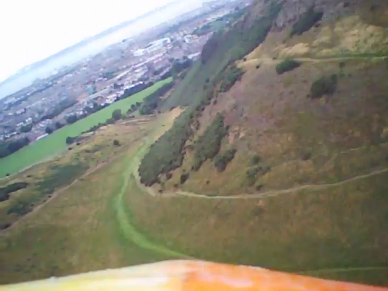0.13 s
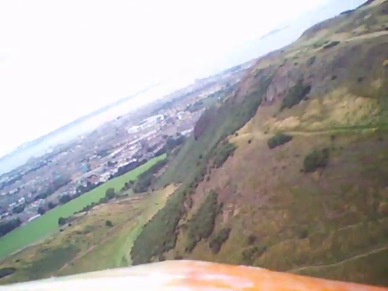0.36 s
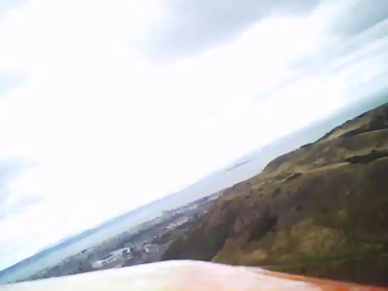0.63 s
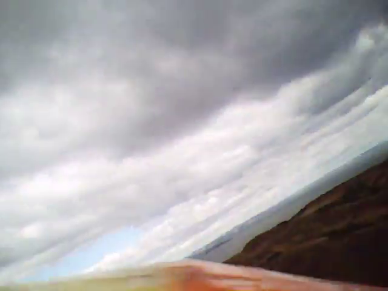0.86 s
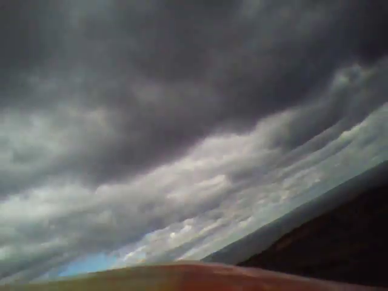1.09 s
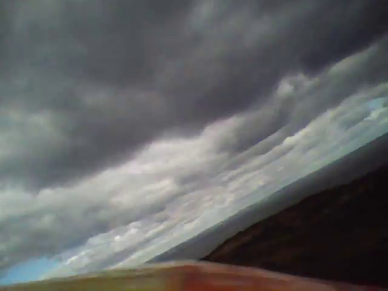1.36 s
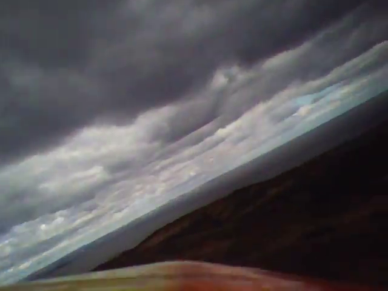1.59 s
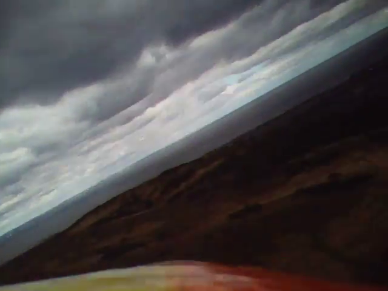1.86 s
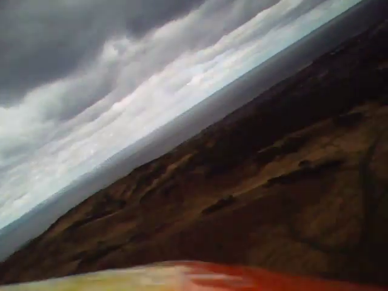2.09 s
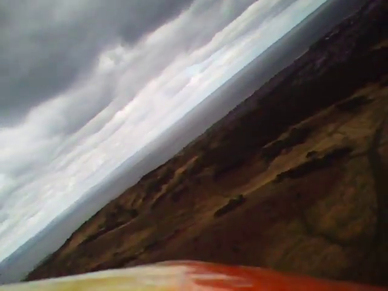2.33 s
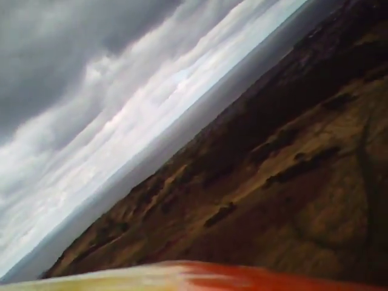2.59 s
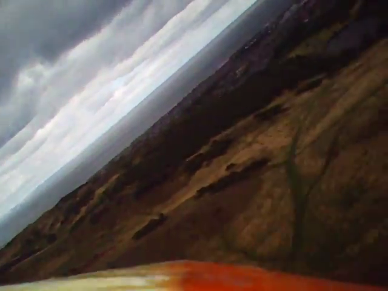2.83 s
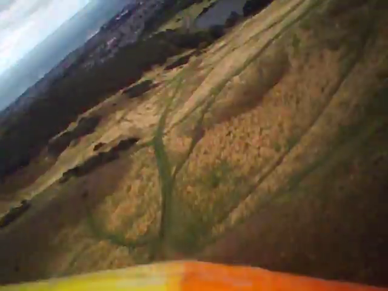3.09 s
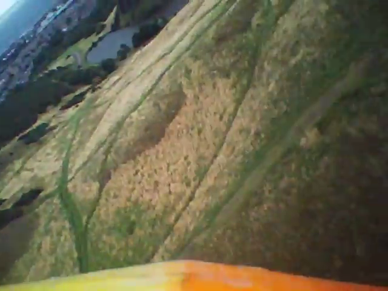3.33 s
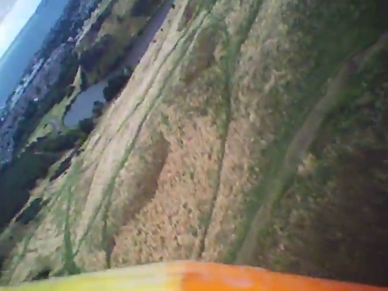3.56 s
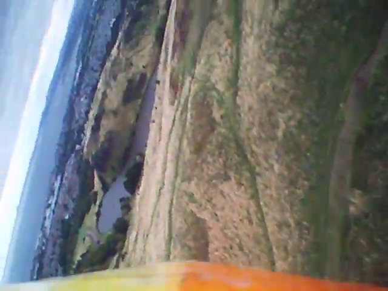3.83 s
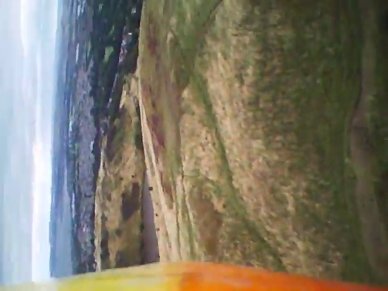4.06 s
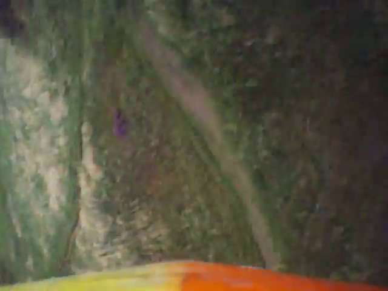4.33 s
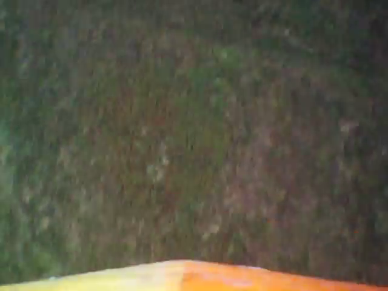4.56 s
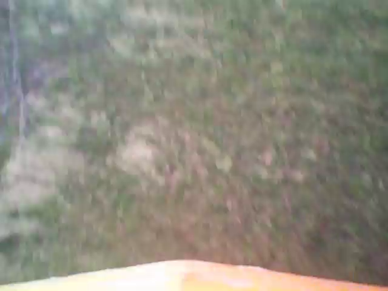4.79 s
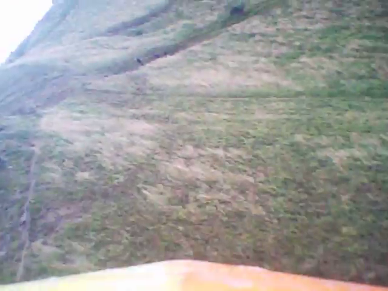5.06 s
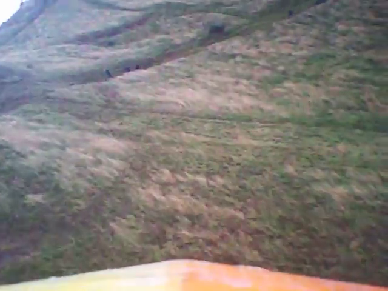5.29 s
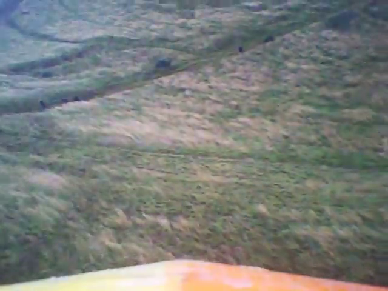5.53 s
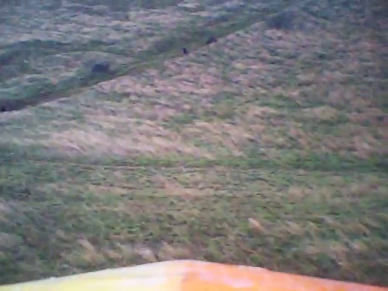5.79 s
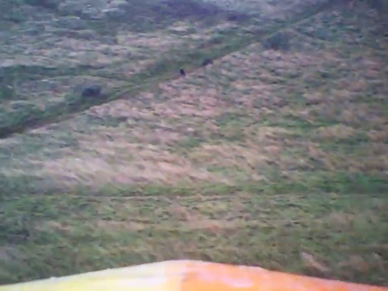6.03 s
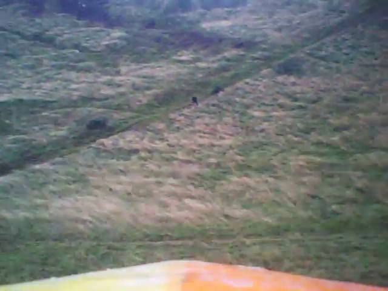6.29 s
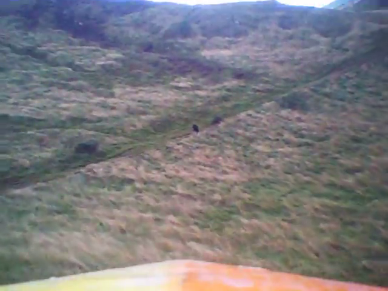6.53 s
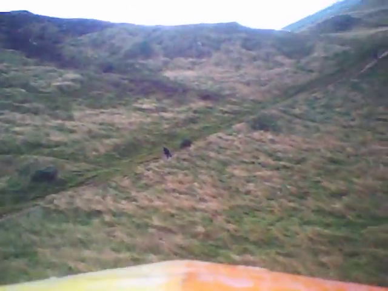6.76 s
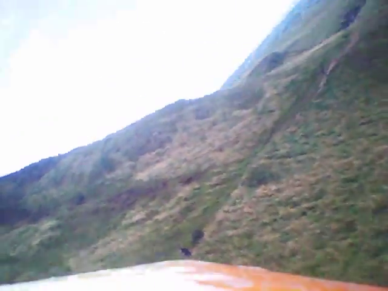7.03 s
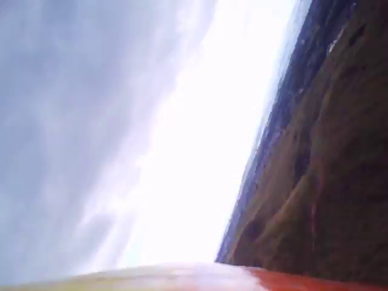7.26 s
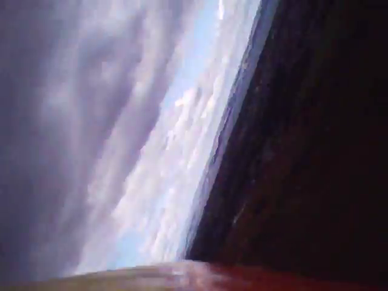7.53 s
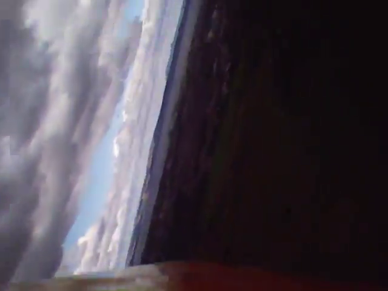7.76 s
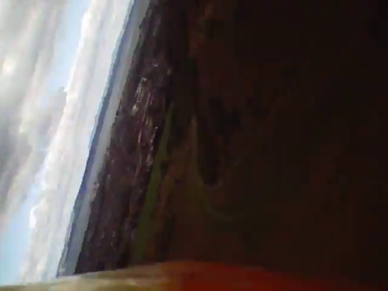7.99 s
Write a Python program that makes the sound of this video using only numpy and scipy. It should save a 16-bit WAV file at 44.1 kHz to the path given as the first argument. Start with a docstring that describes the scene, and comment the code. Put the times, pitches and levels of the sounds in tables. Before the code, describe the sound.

Heavily distorted airflow batters a tiny exposed microphone in flight, ragged and loud, easing twice into deep throbbing buffets before roaring back.

```python
"""Airflow tears past the bare microphone of a small camera on a flying glider: slow buffeting eddies
and a finer rush, both made of filtered noise, come in uneven gusts.
They overdrive the preamplifier into its rails. A converter with no input filter reads it 8000 times a second,
and the overshoots of the smoothing filter are cut off at full scale."""
import sys
import numpy as np
from scipy import signal
from scipy.fft import rfft, irfft
from scipy.io import wavfile
from scipy.ndimage import uniform_filter1d, map_coordinates

SR = 44100
rng = np.random.default_rng(int(sys.argv[2]) if len(sys.argv) > 2 else 0)


def bounce(signal):
    """Save signal as a 16-bit WAV file at the path given by the first command-line argument."""
    frames = np.transpose(np.atleast_2d(signal))
    limited = np.clip(frames, -1, 1)
    pcm = np.round(limited * 32767).astype(np.int16)
    wavfile.write(sys.argv[1], SR, pcm)


def gain_from_decibels(decibels):
    """Convert decibel values to linear amplitude factors."""
    exponent = np.asarray(decibels, float) / 20
    return 10 ** exponent


N = 358533  # length in samples
CONVERTER_HZ = 8000  # readings a second
FULL_SCALE = 0.7071  # largest level of the converter


def unit_power(gain):
    """Brings each column of a frequency-by-time gain to power 1."""
    return gain / np.sqrt(np.mean(gain ** 2, axis=0))


def column(rows, k, t):
    """Reads one column of a table at the times t, in straight lines between rows."""
    rows = np.array(rows)
    return np.interp(t, rows[:, 0], rows[:, k])


def wobble(rate, t):
    """A smooth random curve through knots of rms 1, rate of them a second."""
    knots = rng.standard_normal(int(N * rate / SR) + 9)
    return map_coordinates(knots, [t * rate])


# pitch of the buffeting eddies: t/s, f/Hz
BUFFET_PITCH = [(0, 99), (.5, 83.5), (.85, 52), (1.3, 108.7), (1.7, 70.7), (1.95, 132), (2.15, 88),
                (2.5, 71.2), (3.7, 71.9), (4.0, 90.3), (4.35, 152.7), (4.5, 115.3), (4.9, 88), (5.5, 87.6),
                (5.75, 128.5), (6.1, 94.8), (7.2, 104.4), (7.5, 82.7), (8.13, 91)]


def buffet(hz, t, loose=1.23, clean=2.1, calm=0.18):
    """Large eddies shed at a loose pitch, a resonance that sharpens when a strong flow carries little rush."""
    little_rush = np.exp(-column(FLOW, 2, t) / calm)
    strength = np.clip(column(FLOW, 1, t) / 10, 0, 1)
    sharpness = loose + clean * little_rush * strength
    u = hz / column(BUFFET_PITCH, 1, t)
    resonance = 1 + (sharpness * (u - 1 / u)) ** 2
    tilt = (0.32 + u ** 2) * (1 + 0.31 * u ** 2)
    return unit_power(u / np.sqrt(resonance * tilt))


# surges of finer eddies: middle t/s, half length t/s, rise of the rush's upper corner f/Hz
RUSH_SURGES = [(0, 0.18, 420), (1.927, 0.19, 644), (2.696, 0.11, 220), (3.282, .16, 730), (3.727, .05, 302),
               (4.2, 0.081, 248), (4.559, 0.1174, 730), (5.818, 0.23, 440), (6.3, 0.28, 180),
               (7.697, .1, 198), (8.13, .1, 710)]


def corner(t):
    """Upper corner of the rush in Hz: it rises and falls in a bell with each surge."""
    between_surges_hz = 384.3
    bells = (rise_hz * np.exp(-((t - middle) / half) ** 2) for middle, half, rise_hz in RUSH_SURGES)
    return between_surges_hz + sum(bells)


def rush(hz, t, span=0.2, slope=3.93, tail_db=-32):
    """Small eddies: a broad band whose edges move with their size, a weak hiss above."""
    upper_hz = corner(t)
    band = 1 / (1 + (hz / upper_hz) ** slope)
    hiss = gain_from_decibels(tail_db) ** 2 / (1 + (hz / 4000) ** 2)
    low_cut = 1 + (span * upper_hz / hz) ** 2
    return unit_power(np.sqrt((band + hiss) / low_cut))


# flow at the microphone port, before gusts and random swings: t/s, pressure level over the rail gap/dB,
# rush's share of the power [0-1], shift of the working point, negative as it sags [in rms of the pressure]
FLOW = [(0, 17.5, .68, -.54), (.75, 16, 0.66, -0.47), (.98, 13, 0.61, -.38), (1.12, 10, 0.39, -0.12),
        (1.33, 4, 0.3, -.1), (1.48, 15, .55, -0.26), (1.95, 10.5, .9, -0.27), (2.12, 12, .82, -.32),
        (2.4, 0, 0.19, 0.21), (2.55, 0.5, .22, 0.28), (2.85, 0.5, 0.17, 0.11), (2.98, 4, .22, 0.081),
        (3.17, 14.5, .75, -.48), (3.35, 16, .95, -0.42), (3.6, 14.5, 0.42, -0.5), (3.76, 15, .58, -.36),
        (3.92, 8, 0.1, -0.028), (4.28, 12.5, 0.09, -0.15), (4.46, 22.5, 0.59, -.55),
        (5.3, 16.5, .5, -0.513), (5.7, 18, .8, -0.65), (6.2, 23, 0.64, -0.64), (6.98, 19.5, .55, -0.6),
        (7.13, 9.5, 0.34, -0.28), (7.36, 7, 0.41, -0.21), (7.5, 18, 0.61, -0.53), (8.13, 18.5, .7, -.58)]


def airflow():
    """Both sizes of eddy come in uneven gusts of their own; the working point sags under the load of the flow."""
    hz, t, noise = signal.stft(rng.standard_normal((2, N)), SR, nperseg=2048)
    hz = hz[:, None] + 1  # keeps clear of zero
    share = np.clip(column(FLOW, 2, t), 0, 1)
    layers = noise * [np.sqrt(1 - share) * buffet(hz, t), np.sqrt(share) * rush(hz, t)]
    slow, fine = signal.istft(layers, SR, nperseg=2048)[1][:, :N]
    t = np.arange(N) / SR
    slow_gusts = slow * gain_from_decibels(1.26 * wobble(12, t))
    fine_gusts = fine * gain_from_decibels(1.87 * wobble(25, t) + 1.75 * wobble(90, t))
    working_point = column(FLOW, 3, t)
    pressure_db = column(FLOW, 1, t) + 3 * wobble(8, t)  # quick random swings
    return gain_from_decibels(pressure_db) * (slow_gusts + fine_gusts + working_point)


def scene():
    """The gusting air pressure with the sag of the working point, in units of the gap between the rails."""
    return airflow()[None]


def preamplifier(x, middle=0.47, top_knee=5.0, bottom_knee=12.0, sag=0.0019):
    """A soft upper rail and a hard lower one; the gap shrinks under load; a capacitor centres the result."""
    rail_gap, offset = 1.155, -0.1158  # unloaded gap, constant shift of the output
    coupling_s = 0.15  # time constant of the capacitor
    knee = np.where(x > 0, top_knee, bottom_knee)
    reach = np.where(x > 0, 1 - middle, middle)
    overdrive = np.minimum(np.abs(x / reach), 1e3)
    railed = x / (1 + overdrive ** knee) ** (1 / knee)
    load_db = 10 * np.log10(uniform_filter1d(x ** 2, size=SR // 4) + 1)
    railed = railed * (rail_gap - sag * load_db)
    leak = 1 / (coupling_s * SR)
    start = railed[:round(coupling_s * SR)].mean()
    centre = signal.lfilter([leak], [1, leak - 1], railed, zi=[start])[0]
    return railed - centre + offset


def converter(x, skirt_hz=520):
    """Bare readings, so the edges fold down into the band, then a smoothing filter that rings at each step."""
    lag = 0.178  # in readings
    reading = np.arange(-400, N * CONVERTER_HZ // SR + 400)  # spare readings at both ends
    at = (reading + lag) * SR / CONVERTER_HZ
    readings = map_coordinates(x, [at], order=1, mode="mirror")
    readings = np.clip(readings, -FULL_SCALE, FULL_SCALE)
    stuffed = np.zeros(2 * len(readings))  # a zero after each reading
    stuffed[::2] = 2 * readings
    hz = np.fft.rfftfreq(len(stuffed), 0.5 / CONVERTER_HZ)
    edge = np.clip((hz - CONVERTER_HZ / 2) / skirt_hz, -1, 1)
    lowpass = (1 - np.sin(np.pi / 2 * edge)) / 2
    shift = np.exp(-2j * np.pi * hz * at[0] / SR)  # puts the first reading back at its own time
    size = len(readings) * SR // CONVERTER_HZ
    smooth = irfft(rfft(stuffed) * shift * lowpass, size) * size / len(stuffed)
    return np.clip(smooth[:N], -FULL_SCALE, FULL_SCALE)


def band_limit(x):
    """A steep low-pass at the top of the band."""
    return signal.sosfilt(signal.butter(12, 15800, fs=SR, output="sos"), x)


def record(dry):
    """The dry signal drives the preamplifier, and the converter reads its output."""
    railed = preamplifier(dry[0])
    mix = converter(railed)[None]
    return band_limit(mix)


dry = scene()
out = record(dry)
bounce(out)
```